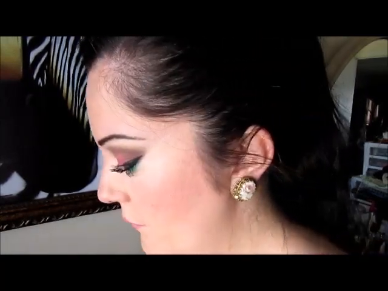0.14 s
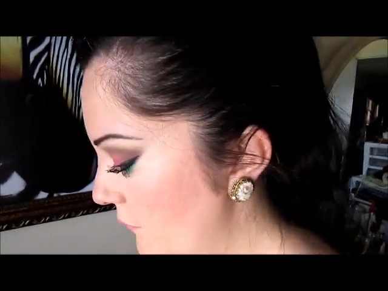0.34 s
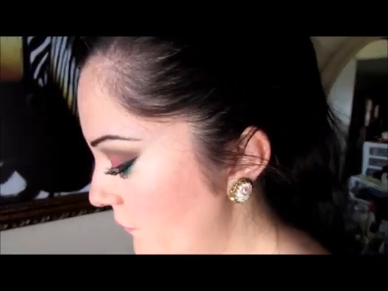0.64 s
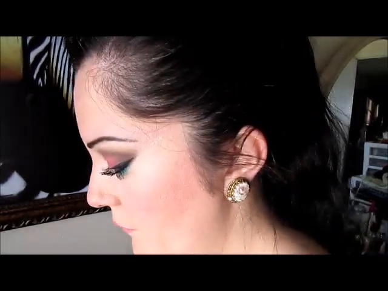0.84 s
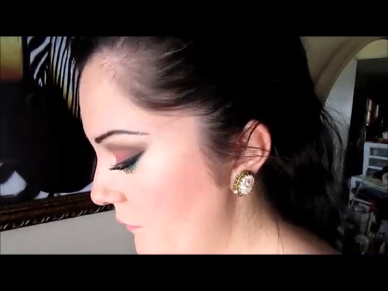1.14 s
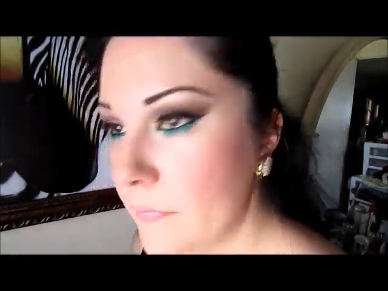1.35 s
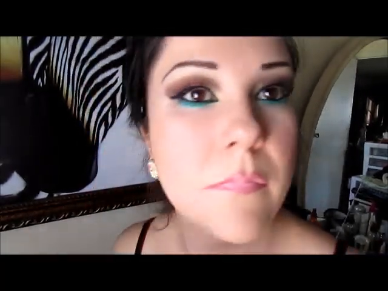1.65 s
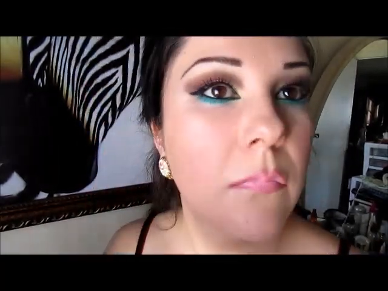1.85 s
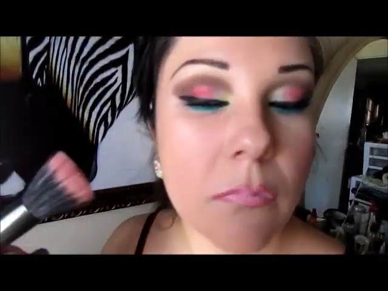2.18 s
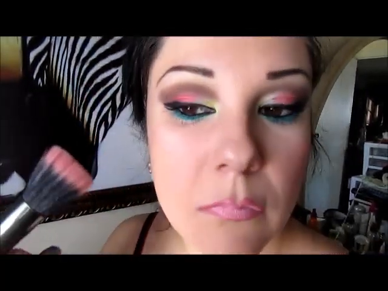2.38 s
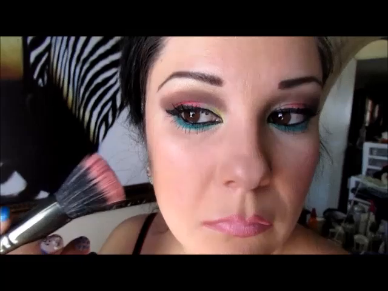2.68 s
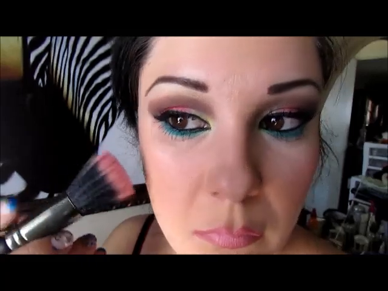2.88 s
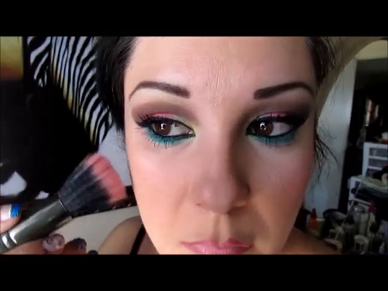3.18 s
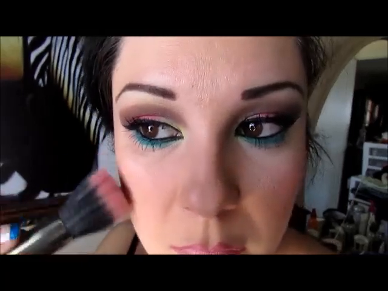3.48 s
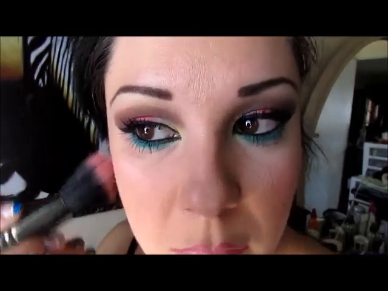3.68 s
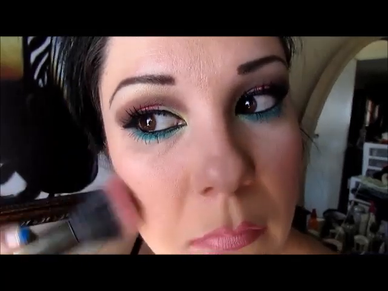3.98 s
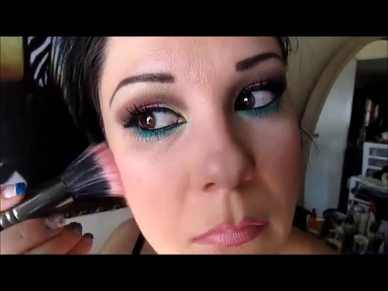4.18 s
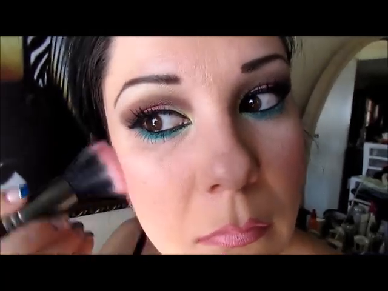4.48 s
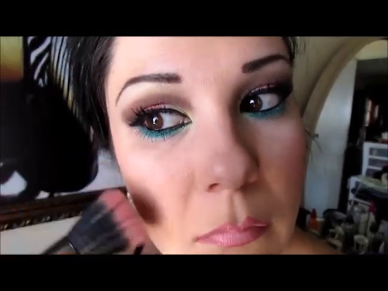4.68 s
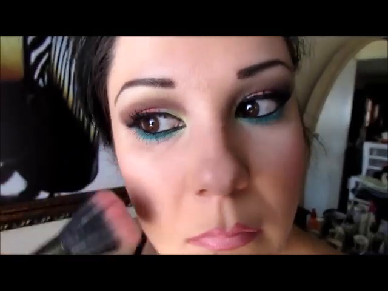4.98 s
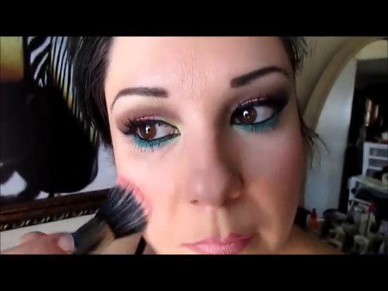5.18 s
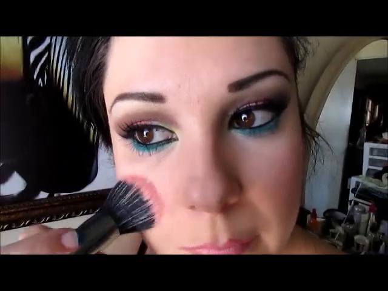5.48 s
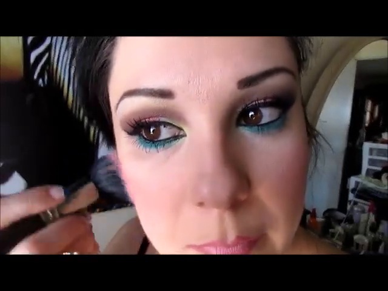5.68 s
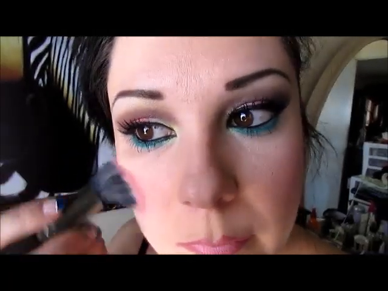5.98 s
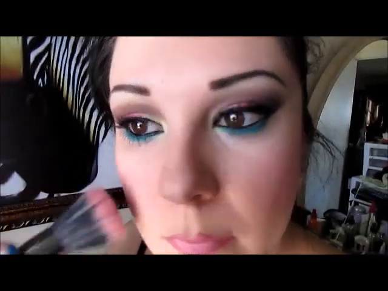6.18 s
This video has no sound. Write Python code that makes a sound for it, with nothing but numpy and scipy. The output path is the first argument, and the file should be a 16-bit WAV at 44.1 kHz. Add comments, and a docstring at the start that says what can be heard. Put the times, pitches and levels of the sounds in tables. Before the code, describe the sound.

Light plastic clicks and rubbing as a makeup case is opened, followed by a quick cluster of dull knocks and steady microphone rumble.

```python
"""Makeup compact at a dressing table

A plastic compact is picked up, opened and handled in a small furnished room, a little to the left:
impacts excite the modes of its case, and fingers rub it by stick-slip friction. Dull knocks follow,
reaching two closely spaced microphones as structure-borne sound through their support, and a brush
handle ticks faintly. The microphones add hiss and a wide, low rumble."""
import sys
import numpy as np
from scipy import signal
from scipy.fft import rfft, irfft, next_fast_len
from scipy.io import wavfile

SR = 44100
rng = np.random.default_rng(int(sys.argv[2]) if len(sys.argv) > 2 else 0)


def unload_audio(sound):
    """Save the sound as a 16-bit wav file, at the path given as the first command line argument."""
    columns = np.transpose(np.atleast_2d(sound))
    # keep every value between -1 and 1, then stretch to whole-number steps
    steps = np.round(np.clip(columns, -1, 1) * 32767)
    wavfile.write(sys.argv[1], SR, steps.astype(np.int16))


N = 279549
AGE = np.arange(SR * 2 // 5) / SR   # seconds since a contact
STRONG_KNOCK_DB = -23   # above this, a knock swells again and chatters

# knocks on the support: start_s, level_db, hardness (0-1), lever (distance from its centre, 0-1)
KNOCK_EVENTS = [(2.1926, -27, 1, 0.5), (2.496, -23, 0.4, 0.3), (2.549, -19, 0.28, 0),
                (2.673, -18, 0.38, .02), (2.697, -30, 0.54, 0.2), (2.7481, -14.5, 0.4, 0.12),
                (4.9576, -30.5, 0.25, 1), (5.641, -39.5, 0, 1)]
# spectrum of hard edges meeting: frequency_hz, density_db
SNAP_SPECTRUM = [(2000, -27), (3800, -4), (5000, 2), (6200, 4), (7700, 0), (10000, -9), (13000, -14),
                 (16000, -31)]


def compact():
    """Impact excitation: contacts ring body and shell; hardness trades body ring for crack and snap."""
    # plastic contacts: start_s, level_db, hardness (0 a padded bump, 1 bare edges)
    clicks = [(0.307, -34, 0.35), (0.4406, -31.5, 0.21), (0.4555, -39, 0.6), (0.463, -34, 0.37),
              (0.4919, -44, 0.72), (0.5167, -39.5, 0.68), (0.5239, -41, 0.87), (0.5418, -42.5, 0.98),
              (0.548, -36, 0.64), (0.699, -48, 0.33), (0.708, -36, 0.17), (0.7207, -45.5, 0.06),
              (0.7483, -52.5, .95), (0.805, -47.5, 1), (0.829, -51, .35), (0.852, -43, 0.59),
              (0.901, -36, 0.44), (0.941, -51, 0.23), (0.9466, -45, 0.07), (1.023, -59, 0),
              (1.084, -54, 0.28), (1.119, -54.5, 0.17), (1.129, -49.5, 0.28)]
    # modes of the hollow case in the hand: pitch_hz, level_db, t60_s
    body_modes = [(245.4, -11, 0.08), (311.3, -7, 0.046), (450, 0.5, 0.038), (557.5, 2, 0.029),
                  (670, -3.5, 0.017)]
    # modes of the thin lid and base: pitch_hz, level_db, t60_s
    shell_modes = [(804, -1, 0.024), (924, -3, 0.035), (1055, 0, 0.025), (1234, -2.5, 0.031),
                   (1343, 0.5, 0.028), (1460, -1, 0.025), (1584, -11, 0.029), (1816, -2, 0.013),
                   (2086, -10, 0.016)]
    # spectrum of flexing plastic: frequency_hz, density_db
    crack_spectrum = [(600, -1), (1500, -3), (2600, 3), (3500, 1), (4400, -5.5), (7000, -28)]
    low, high = np.zeros((2, 2, N))
    for start_s, level_db, hardness in clicks + fumbles(count=7):
        body = struck(body_modes, detune=0.026, spread_db=3)
        body = unit_hit(reflected(body, wander=0.032, nearest_gain=0.45))
        shell = struck(shell_modes, detune=0.051, spread_db=2)
        shell = unit_hit(reflected(shell, wander=0.066, nearest_gain=2.27))
        crack = snap(crack_spectrum, t60_s=0.022, grit_db=-2)
        crack = unit_hit(reflected(crack, wander=0.06, nearest_gain=0.62))
        edge = snap(SNAP_SPECTRUM, t60_s=0.022, grit_db=5)
        # the direct treble is faint, so its first reflection is relatively strong
        edge = unit_hit(reflected(edge, wander=0.06, nearest_gain=1.8))
        body *= from_db(15 - 25 * hardness)
        crack *= from_db(-21 + 18.5 * hardness)
        edge *= from_db(-22.5 + 15.5 * hardness) * contact_rise(hardness, soft_s=0.0024, hard_s=0.0002)
        add(low, start_s, from_db(level_db) * (panned(body, pan_db=6) + panned(shell, pan_db=5)))
        add(high, start_s, from_db(level_db) * (panned(crack, pan_db=3.5) + panned(edge, pan_db=-1)))
    add(high, start_s=0.462, hit=catch())
    low = room(high_passed(low, corner_hz=110), wet_db=-9.5, t60_s=0.19, build_s=0.0037, width=0.81)
    return low + room(high, wet_db=-3.5, t60_s=0.21, build_s=0.0011, width=0.99)


def fumbles(count, start_s=0.88, end_s=1.28, level_db=-59.5, fade_db_per_s=13, hardness=0.22):
    """Settling impacts: uneven bumps weaken as the open case comes to rest; one contact row each."""
    delays_s = (np.arange(count) + rng.random(count)) / count * (end_s - start_s)
    return [(start_s + delay_s, level_db - fade_db_per_s * delay_s, hardness) for delay_s in delays_s]


def catch():
    """Sliding friction: the catch drags over its lip with a short, bright rasp and lets go."""
    # spectrum of the rasp: frequency_hz, density_db
    rasp_spectrum = [(3000, -15), (5000, -6), (8000, 4), (10500, -6), (14000, -13), (16000, -22)]
    rasp = snap(rasp_spectrum, t60_s=0.029, grit_db=3) * rise(0.0025)
    return from_db(-43) * unit_hit(rasp)


def knocks(swell_delay_s=0.0458, swell_db=-13, swell_rise_s=0.0097):
    """Structure-borne sound: hard knocks bring out the support's upper modes, off-centre ones rock it."""
    # rocking modes, pushing one microphone while pulling the other: pitch_hz, level_db, t60_s
    rocking_modes = [(113, -13, 0.12), (180, 11, 0.037), (202.4, -0.5, 0.24), (237.5, 8, 0.055)]
    # spectrum of the tick that starts a knock: frequency_hz, density_db
    tick_spectrum = [(800, -8), (2000, 13), (3800, -1), (5000, -13.5), (7500, -13), (11000, -23),
                     (16000, -31)]
    out = np.zeros((2, N))
    for start_s, level_db, hardness, lever in KNOCK_EVENTS:
        push = contact_rise(hardness, soft_s=0.0026, hard_s=0.00068)
        hum, thud = support(0, 305), support(305, 850)
        ring, upper = support(850, 1100), support(1100, SR)
        hum *= from_db(-17.5 + 13.5 * lever)
        upper *= from_db(-24.5 + 28 * hardness)
        modes = hum + thud + from_db(2) * ring + upper
        rocking = unit_hit(push * struck(rocking_modes, detune=0.046, spread_db=1.5)) * [[1], [-1]]
        rocking *= from_db(-5 + 4.5 * lever)
        tick = snap(tick_spectrum, t60_s=0.033, grit_db=7)
        tick = unit_hit(reflected(tick, wander=0.05, nearest_gain=1.5))
        tick *= from_db(-43 + 13.5 * hardness)
        add(out, start_s, from_db(level_db) * (push * modes + rocking + panned(tick, pan_db=-1.5)))
        if level_db > STRONG_KNOCK_DB:   # the ring near 1 kHz swells softly a second time
            add(out, start_s + swell_delay_s, from_db(level_db + swell_db) * ring * rise(swell_rise_s))
    return room(out + chatter(count=3), wet_db=-16, t60_s=0.17, build_s=0.0041, width=0.26)


def support(low_hz, high_hz, detune=0.006):
    """Mode shapes: each support mode in the band has its own level and phase at the two microphones."""
    # modes of the support: pitch_hz, level_db, t60_s, pan_db (left over right), left_lead_rad
    support_modes = [(282, -3.5, 0.32, 7, -2), (328, 1.5, 0.073, 7.5, -1.63), (460.6, -6, 0.061, -4.5, 1.5),
                     (590, -9.5, 0.035, 7.5, -1.5), (757, -1, 0.084, -1.5, 3), (950, -11, 0.099, 11, 1.9),
                     (968, -2.5, 0.051, 6.5, 1.5), (1246, -9.5, 0.041, -1, 5.5),
                     (1546, 2, 0.025, 10.5, -2.5), (1516, 9.5, 0.02, 5, 3), (1726, -8.5, 0.043, -8, -2),
                     (2070, -18, 0.041, -7.5, 3), (2370, -15, 0.028, 4, 3), (3020, -22, 0.021, 0, 1.8)]
    out = np.zeros((2, len(AGE)))
    for pitch_hz, level_db, t60_s, pan_db, left_lead_rad in support_modes:
        if low_hz <= pitch_hz < high_hz:
            detuned_hz = pitch_hz * (1 + detune * rng.standard_normal())
            phases = np.array([[left_lead_rad], [-left_lead_rad]]) / 2
            swing = np.sin(2 * np.pi * detuned_hz * AGE + phases)
            out += panned(swing * fade(t60_s) * from_db(level_db), pan_db)
    return out


def chatter(count, delay_s=0.0062, gap_s=0.003, relative_db=-53.5):
    """Intermittent contact: after a strong knock, a loose part taps once per swing of the support."""
    out = np.zeros((2, N))
    for start_s, level_db, _, _ in KNOCK_EVENTS:
        if level_db > STRONG_KNOCK_DB:
            for k in range(count):
                touch = unit_hit(snap(SNAP_SPECTRUM, t60_s=0.0041, grit_db=5))
                add(out, start_s + delay_s + k * gap_s, from_db(level_db + relative_db) * touch)
    return out


def fingers(attack_s=0.017, release_t60_s=0.41):
    """Stick-slip friction: skin rubs the turning case; each slide builds, holds and dies away."""
    # finger slides, timed from the end of the attack: start_s, hold_s, level_db
    slides = [(0.314, 0.027, -50.5), (0.438, 0.15, -48.5), (0.702, 0.15, -48), (0.893, 0.044, -47),
              (1.078, 0.043, -55)]
    # spectrum of skin rubbing plastic: frequency_hz, density_db
    rub_spectrum = [(50, -10), (120, 7), (220, 0), (600, -3), (1400, -11.5), (2500, -30.5), (8000, -34.5),
                    (16000, -52)]
    t = np.arange(N) / SR
    envelope = np.zeros(N)
    for start_s, hold_s, level_db in slides:
        attack = np.clip(1 + (t - start_s) / attack_s, 0, 1)
        release = np.exp(-np.log(1000) * np.maximum(t - start_s - hold_s, 0) / release_t60_s)
        envelope += from_db(level_db) * attack * release
    return panned(envelope * noise(rub_spectrum, N, grit_db=7), pan_db=8)


def brush():
    """Free vibration: shifting fingers excite the brush handle, which rings in tiny pitched ticks."""
    # ticks of the handle: start_s, level_db
    ticks = [(3.0819, -60.5), (3.5618, -62.5), (4.2817, -61.5), (4.4002, -55.5), (4.761, -61), (4.879, -64),
             (5.7176, -66)]
    # modes of the handle: pitch_hz, level_db, t60_s
    handle_modes = [(1300, 4, 0.035), (1648, 21, 0.028), (1600, -7, 0.013)]
    out = np.zeros((2, N))
    for start_s, level_db in ticks:
        tick = struck(handle_modes, detune=0.01, spread_db=2.5) * rise(0.0015)
        add(out, start_s, from_db(level_db) * unit_hit(tick))
    return out


def background(whine_hz=15734):
    """Noise floor: hiss and a thin electronic whine in phase at both microphones, rumble in antiphase."""
    # spectrum of the noise common to both microphones: frequency_hz, density_db
    hiss_spectrum = [(12, -63), (20, -12), (26, -36), (41, -6), (70, 0), (146, -7.5), (293, -7.5),
                     (459, -12), (738, -14), (1190, -19), (1610, -17), (2530, -27), (4810, -31.5),
                     (7730, -30), (16000, -36.5)]
    # spectrum of their difference: frequency_hz, density_db
    rumble_spectrum = [(12, -54), (20, -16), (88, 0), (134, 1.5), (163, -3), (193, 0.5), (357, -5),
                       (542, -8), (849, -13), (1090, -15), (1660, -23.5), (3630, -43.5), (5080, -47),
                       (9950, -43.5), (16000, -49.5)]
    rumble = from_db(-46) * noise(rumble_spectrum, N) * [[1], [-1]]
    hiss = from_db(-58.5) * noise(hiss_spectrum, N)
    whine = from_db(-87) * np.sin(2 * np.pi * whine_hz * np.arange(N) / SR)
    return hiss + rumble + whine


def struck(modes, detune, spread_db):
    """Modal superposition: damped sines, detuned by the grip and reweighted by the point of contact."""
    out = np.zeros(len(AGE))
    for k, (pitch_hz, level_db, t60_s) in enumerate(modes):
        shift, weight = rng.standard_normal(2)
        swing = np.sin(2 * np.pi * pitch_hz * (1 + detune * shift) * AGE)
        out += (-1) ** k * from_db(level_db + spread_db * weight) * fade(t60_s) * swing
    return out


def snap(spectrum, t60_s, grit_db):
    """Contact noise: a brief, decaying burst of uneven micro-impacts as two hard edges meet."""
    return noise(spectrum, len(AGE), grit_db) * fade(t60_s)


def noise(spectrum, size, grit_db=0):
    """Spectral shaping: coloured noise of rms 1; grit makes a few impulses stand out."""
    frequency_hz, density_db = np.transpose(spectrum)
    padded = next_fast_len(size)
    bins_hz = np.maximum(np.fft.rfftfreq(padded, 1 / SR), 1)
    colour = from_db(np.interp(np.log(bins_hz), np.log(frequency_hz), density_db))
    impulses = rng.standard_normal(padded) * from_db(grit_db * rng.standard_normal(padded))
    x = irfft(rfft(impulses) * colour, padded)[:size]
    return x / np.std(x)


def high_passed(x, corner_hz):
    """High-pass: the compact's sound is cut below the corner frequency."""
    return signal.sosfilt(signal.butter(2, corner_hz, "high", fs=SR, output="sos"), x + 1e-18)


def reflected(x, wander, nearest_gain):
    """Early reflections: nearby surfaces repeat a click at delays that shift with the hands."""
    # echoes from nearby surfaces, nearest first: delay_s, gain
    reflections = [(.0039, 0.51), (.0056, 0.18), (0.0151, 0.28)]
    out = x.copy()
    for k, (delay_s, gain) in enumerate(reflections):
        lag = round(abs(delay_s * (1 + wander * rng.standard_normal())) * SR)
        echo = np.pad(x, (lag, 0))[:len(x)]
        out += gain * (nearest_gain if k == 0 else 1) * echo
    return out


def room(x, wet_db, t60_s, build_s, width):
    """Reverberation: a short diffuse tail, only partly correlated between the two microphones."""
    # spectrum of the tail: frequency_hz, density_db
    tail_spectrum = [(100, 12), (300, 2.5), (1000, 4.5), (2000, 2), (6000, -4.5), (16000, 3.5)]
    envelope = fade(t60_s) * (1 - np.exp(-(AGE / build_s) ** 2))
    mid, side = (noise(tail_spectrum, len(AGE)) * envelope for _ in range(2))
    tails = np.array([mid + width * side, mid - width * side])
    tails /= np.sqrt(np.sum(tails ** 2) / 2)
    return x + from_db(wet_db) * signal.fftconvolve(x, tails, axes=1)[:, :N]


def contact_rise(hardness, soft_s, hard_s):
    """Contact time: the softer the impact, the longer its sound takes to build."""
    return rise(soft_s * (hard_s / soft_s) ** hardness)


def rise(time_constant_s):
    """First-order growth from silence towards full amplitude."""
    return 1 - np.exp(-AGE / time_constant_s)


def fade(t60_s):
    """Damping: exponential decay from the moment of contact, 60 dB in t60_s."""
    return np.exp(-np.log(1000) * AGE / t60_s)


def from_db(db):
    """Decibels to amplitude ratio."""
    return 10 ** (np.asarray(db) / 20)


def unit_hit(x):
    """Normalisation: a hit is scaled to rms 1 over its first 20 ms."""
    return x / np.sqrt(np.mean(x[..., :SR // 50] ** 2))


def panned(x, pan_db):
    """Level-difference stereo: positive pan_db places a sound towards the left."""
    return x * from_db([[pan_db / 2], [-pan_db / 2]])


def add(out, start_s, hit):
    """Superposition: a hit joins the mix at its start time."""
    start = round(start_s * SR)
    out[:, start:start + hit.shape[-1]] += hit[..., :N - start]


def gain_control(x, threshold_db, slope, release_db_per_s):
    """Compression: peaks over the threshold push the gain down, and it creeps back."""
    peak_db = 20 * np.log10(np.abs(x).max(axis=0) + 1e-9)
    over_db = np.maximum(peak_db - threshold_db, 0)
    recovery_db = release_db_per_s * np.arange(N) / SR
    held_db = np.maximum.accumulate(slope * over_db + recovery_db) - recovery_db
    smoothed_db = signal.lfilter([0.01], [1, -0.99], held_db)
    return x * from_db(-smoothed_db)


def scene():
    """Superposition of everything heard at the dressing table."""
    return compact() + fingers() + knocks() + brush() + background()


def record(dry, cutoff_hz=15900):
    """Compression and band limiting: the loudest knocks are held down, then the top treble is cut."""
    levelled = gain_control(dry, threshold_db=-9, slope=0.6, release_db_per_s=4.5)
    low_pass = signal.ellip(12, 0.1, 70, cutoff_hz, fs=SR, output="sos")
    return signal.sosfilt(low_pass, levelled)


dry = scene()
out = record(dry)
unload_audio(out)
```